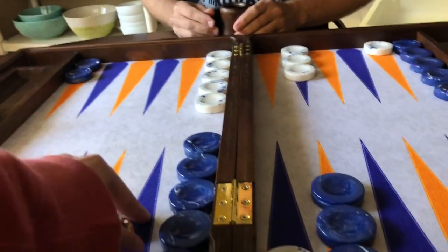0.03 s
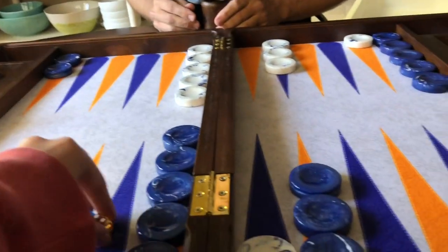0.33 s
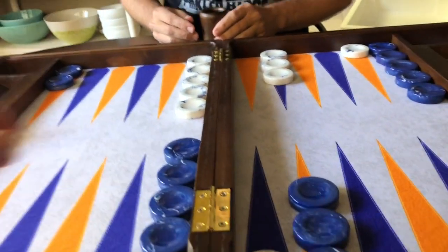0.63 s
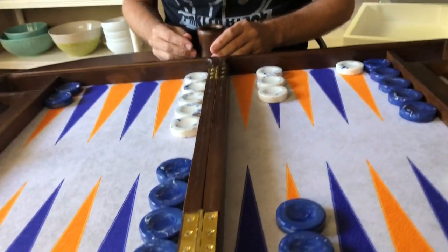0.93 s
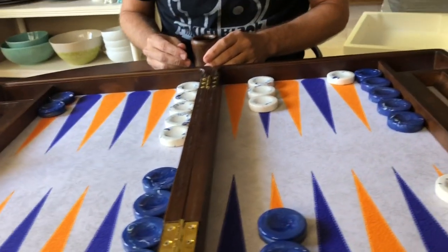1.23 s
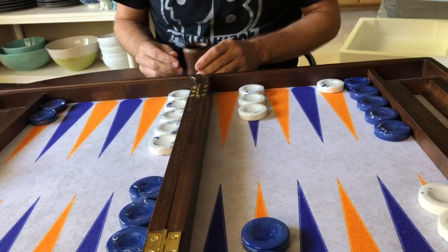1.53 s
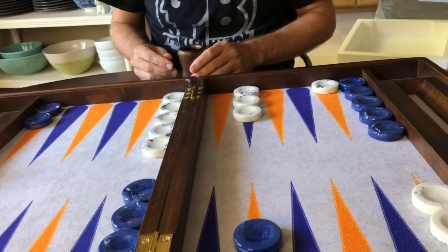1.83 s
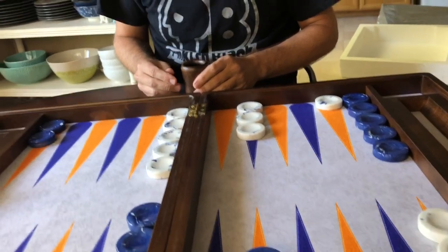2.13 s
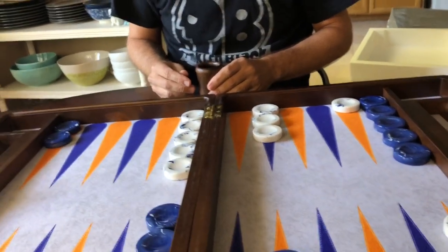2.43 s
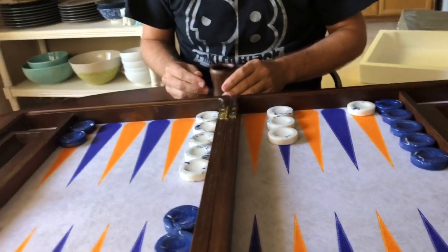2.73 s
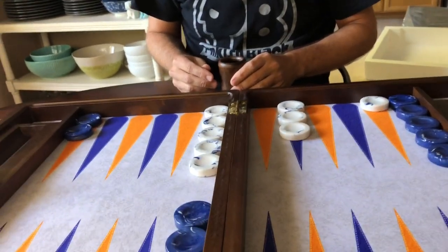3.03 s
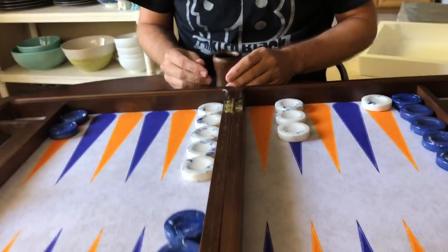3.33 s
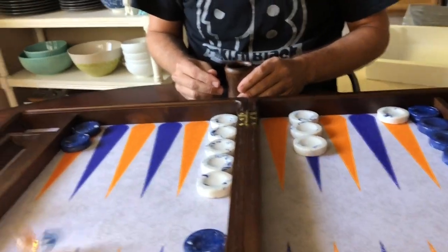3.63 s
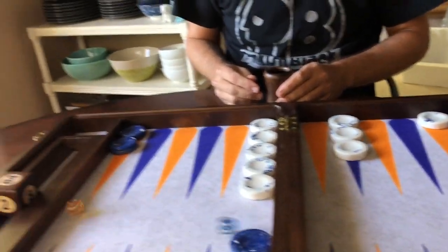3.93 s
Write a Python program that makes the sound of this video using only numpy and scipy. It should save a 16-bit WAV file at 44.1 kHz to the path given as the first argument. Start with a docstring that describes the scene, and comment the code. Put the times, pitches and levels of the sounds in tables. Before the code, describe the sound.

Dice are shaken and thrown on a wooden backgammon board in a quiet room with a faint hum. First a checker clacks down at about 1.4 seconds, followed by soft rustling and sliding. The dice rattle in a cup from 2.2 seconds, fading by 3. Another checker clacks at 3.4. Near 3.7 the dice strike the rim with the loudest knock and bounce briefly.

```python
"""A quiet kitchen, backgammon: a checker is set down on the wooden board, two dice rattle in a cup,
another checker clacks, then the dice are thrown, strike the rim and bounce over the board.
Blows ring damped modes of checker, board, dice and cup; hard edges add a bright crack.
Sleeves, hands and sliding things make shaped noise. The room rings briefly over a faint hum."""
import sys
import numpy as np
from scipy import signal
from scipy.fft import rfft, irfft
from scipy.io import wavfile
from scipy.ndimage import uniform_filter1d

SR = 44100
rng = np.random.default_rng(int(sys.argv[2]) if len(sys.argv) > 2 else 0)


def store_pcm(level_fs):
    """Save levels as 16-bit WAV."""
    pcm = np.round(np.clip(level_fs, -1, 1) * 32767).astype(np.int16)
    wavfile.write(sys.argv[1], SR, np.atleast_2d(pcm).T)


N = 176400

# room tail (frequency [Hz], t60 [s], level [dB])
ROOM_BANDS = [(100, 0.2, 13), (250, 0.58, 7), (600, 0.81, 1), (1270, 0.62, -1.5), (2440, 0.59, -3.5),
              (8000, 0.37, -1.5), (15100, 0.14, 8)]
# room noise (frequency [Hz], level [dB])
FLOOR_SPECTRUM = [(20, -25.5), (64, -5), (134, -8.5), (256, -9.5), (677, -19), (1560, -27), (16000, -40)]
# hum, second harmonic (time [s], level [dB])
HUM_SWELL = [(0, -61.5), (.2, -57.5), (.36, -71), (.7, -70), (.9, -74), (1.4, -84.5), (2, -69), (3.3, -72)]
# hum, steady partials (harmonic [1], level [dB])
HUM_HARMONICS = [(1, -70.5), (3, -80.5), (4, -79), (6, -85)]
# sleeve rustle, sliding hiss, scrape on the board (time [s], level [dB])
RUSTLE_LEVEL = [(0, -74.5), (1.45, -91), (1.56, -45), (1.7, -62.5), (2.3, -73), (2.65, -51), (3, -76),
                (3.2, -65.5), (3.4, -73), (4, -60)]
SLIDE_LEVEL = [(0, -82), (.22, -69.5), (.42, -86), (.72, -72), (.9, -83.5), (1.4, -81), (1.68, -62.5),
               (1.8, -72), (1.96, -62.5), (2.14, -76), (2.32, -58), (2.45, -60), (2.68, -58), (3.0, -70.5),
               (3.15, -66.5), (3.35, -69.5), (3.55, -80)]
SCRAPE_LEVEL = [(1.7, -100), (1.95, -62), (2.06, -68), (2.25, -100)]
# their spectra (frequency [Hz], level [dB])
RUSTLE_SPECTRUM = [(120, -14), (200, 0.5), (450, -5), (1800, -10), (2100, -24), (3690, -22), (14000, -48)]
SLIDE_SPECTRUM = [(1500, -3.5), (3500, -1), (5000, -2.5), (7500, -4), (10000, -7.5), (12500, -11.5),
                  (16000, -10)]
SCRAPE_SPECTRUM = [(2000, -36.5), (3500, -9), (6000, -28)]
# checker impacts (time [s], ring [dB], crack [dB], crack pitch [ratio])
CHECKER_HITS = [(1.4421, -20.5, -21.5, 0.46), (1.4465, -17, -23, 0.67), (1.6181, -46, -38.5, 0.53),
                (3.4112, -24.5, -45, 0.85), (3.4285, -21.5, -35, 0.87)]
# checker resonances (frequency [Hz], level [dB], t60 [s])
CHECKER_MODES = [(1147, -4.5, 0.022), (1316, -3, 0.011), (1668, -9, 0.022), (2432, 0, 0.024),
                 (2440, -16, 0.0099), (3570, -14.5, 0.011), (2390, -33.5, 0.71)]
# crack of a hard edge (frequency [Hz], level [dB])
EDGE_SPECTRUM = [(800, -53), (3000, -9.5), (4500, -10), (7000, 0.5), (9400, -4), (12000, -17), (15500, -26)]
# soft impacts (time [s], level [dB], pitch [Hz])
BUMP_HITS = [(1.4431, -29, 479), (1.523, -35.5, 294), (1.533, -34, 147.6), (1.778, -34.5, 145),
             (2.180, -37.5, 240.5), (2.306, -34, 253), (2.385, -39, 240), (2.432, -39, 296),
             (2.602, -36.5, 260), (3.172, -43.5, 250), (3.266, -46.5, 250), (3.657, -16, 163),
             (3.681, -18, 158), (3.822, -28, 368), (3.826, -28, 177), (3.935, -33, 303)]
# bump resonances (frequency [ratio], level [dB], t60 [s])
BUMP_MODES = [(.76, -4.5, .055), (1, 1, .05), (1.45, -8.5, 0.08)]
# blows on the board (time [s], rim [dB], left half [dB], right half [dB], contact [ms])
BOARD_HITS = [(1.4435, -21, -52, -27.5, 0.019), (1.5233, -29.5, -50, -36, 0.027),
              (1.55, -29.5, -52, -40.5, 0.13), (3.6501, -4.5, -24.5, -45, .0076),
              (3.6525, -18.5, -25, -61, 0.089), (3.6747, -11.5, -29, -59, 0.11),
              (3.822, -26.5, -33.5, -51, 0.29), (3.9335, -33, -32, -59, 0.74)]
# board rim and halves (frequency [Hz], level [dB], t60 [s])
RIM_MODES = [(423, -10, 0.02), (930, -10, 0.024), (1406, -0.5, 0.013), (1852, 2.5, 0.0083),
             (2303, 5, 0.0038), (2930, -4, 0.0046), (5050, -25, 0.0097)]
LEFT_HALF_MODES = [(130, -7, .4), (170, 3, .55), (205, -4, .35), (245, 2, .4), (291, -2, .35),
                   (372, -1, .17), (422, -3, .22), (742, -3, .23), (871, 0, .23), (947, -4, .23),
                   (1156, 0, .2), (1285, -1, .17), (1408, 0, .18), (1488, -3, .18)]
RIGHT_HALF_MODES = [(311, -5, .25), (351, 0, .28), (444, -4, .2), (545, -3, .2), (880, -5, .25),
                    (1084, -2, .33), (1154, -1, .28), (1267, -4, .22)]
# edge on edge (time [s], crack [dB], ring [dB], pitch [Hz])
CLICK_HITS = [(1.5304, -36, -26, 5900), (1.552, -33, -36, 6500), (1.6590, -58, -38, 6360),
              (2.082, -33.5, -62, 6910), (2.0855, -36, -37, 3860), (2.192, -26.5, -49, 7000),
              (2.2720, -25, -28, 7300), (2.298, -39, -31.5, 6000), (2.3132, -22, -24, 7600),
              (2.316, -32.5, -41.5, 6600), (2.4603, -37, -46, 7100), (2.5129, -30, -39, 7160),
              (2.6061, -44.5, -36, 6000), (2.6481, -34, -47, 7260), (2.6612, -31.5, -48, 6600),
              (2.7520, -37, -41, 6200), (2.895, -42, -44, 7200), (2.9033, -43, -49.5, 5980),
              (3.1438, -43.5, -44, 4540), (3.6589, -18.5, -52, 7500), (3.9936, -59, -37.5, 3270)]
# die resonances (frequency [ratio], level [dB], t60 [s])
DIE_MODES = [(1, -3.5, 0.0061), (1.3, -10, 0.0067)]
# dice jostling (start [s], end [s], tick rate [1/s], level [dB])
JOSTLE_SPANS = [(2.192, 2.33, 102, -38.5), (2.416, 2.75, 50, -46.5), (2.751, 2.96, 35, -57)]
# pushes over felt (time [s], length [s], checker [dB], hiss [dB])
FELT_PUSHES = [(1.814, 0.066, -52.5, -84), (3.015, 0.021, -81, -58), (3.161, 0.013, -54.5, -75)]
# pushed checker, felt hiss (frequency [Hz], level [dB])
PUSH_SPECTRUM = [(300, -7), (490, 1), (620, -3.5), (1850, -10), (2200, -14.5), (4000, -16), (8000, -37.5)]
FELT_SPECTRUM = [(3000, -5.5), (8000, 9)]
# dice on the cup (time [s], wall [dB], air [dB], crack [dB], wall pitch [ratio])
DICE_CUP_HITS = [(2.1779, -20.5, -48, -28, 0.54), (2.1871, -16, -25, -21.5, 0.9),
                 (2.2341, -13, -24, -47, 1.033), (2.2526, -20.5, -24.5, -47, 1.13),
                 (2.2756, -18.5, -34, -37, 1.01), (2.3, -38, -31, -36, 0.59),
                 (2.3159, -42, -31.5, -49.5, 0.79), (2.3810, -11, -22, -27.5, 1.02),
                 (2.4323, -56, -28.5, -39.5, 1.9), (2.5299, -73, -30.5, -39, 1),
                 (2.5511, -26, -31, -62, 1.02), (2.5802, -15.5, -27, -33.5, 1.09),
                 (2.6593, -29, -34, -62, 0.91), (2.7488, -33.5, -36.5, -34, 0.83),
                 (2.8507, -46.5, -62, -56, .55), (3.1421, -44, -65, -43, 0.58)]
# cup wall (frequency [Hz], level [dB], t60 [s])
CUP_WALL_MODES = [(1820, 1, 0.0092), (2315, 19, 0.0043), (2885, -6.5, 0.017), (3350, -1.5, 0.0061),
                  (4720, 3.5, 0.0032)]
# air in the cup (frequency [ratio], level [dB], t60 [s])
CUP_AIR_MODES = [(0.99, 0, 0.019)]
# air resonance as the hand shifts over the cup's mouth (time [s], pitch [Hz])
CUP_AIR_PITCH = [(2.38, 812), (2.52, 866), (2.59, 860)]


def undb(db):
    """Decibels to gain."""
    return 10 ** (np.asarray(db) / 20)


def envelope(points):
    """Gain curve from (time [s], level [dB])."""
    return undb(np.interp(np.arange(N) / SR, *np.array(points).T))


def noise(spectrum):
    """Unit-rms noise shaped by (frequency [Hz], level [dB])."""
    hz, db = np.array(spectrum).T
    bin_hz = np.maximum(np.fft.rfftfreq(N, 1 / SR), 1)
    gain = undb(np.interp(np.log(bin_hz), np.log(hz), db))
    bass_rolloff = np.minimum(bin_hz / hz[0], 1) ** 2
    y = irfft(rfft(rng.standard_normal(N)) * gain * bass_rolloff, N)
    return y / y.std()


def wander(rate_hz):
    """Smooth random curve, unit spread."""
    hold = max(int(SR / rate_hz), 1)
    steps = np.repeat(rng.standard_normal(N // hold + 1), hold)
    y = uniform_filter1d(steps, hold)[:N]
    return y / y.std()


def decay(t, t60_s):
    """Fall of 60 dB per t60."""
    return np.exp(-np.log(1000) * t / t60_s)


def peak_amplitude(x):
    """Sine-equivalent amplitude of the loudest millisecond."""
    return np.sqrt(2 * uniform_filter1d(x ** 2, SR // 1000).max())


def ring(modes, rise_cycles, pitch=1, contact_ms=0, scatter=0):
    """Struck modes, detuned at random by `scatter`; longer contact dulls them."""
    t = np.arange(SR // 2) / SR
    y = 0
    for frequency, db, t60_s in modes:
        cycles = frequency * pitch * (1 + scatter * rng.uniform(-1.186, 1)) * t
        attack = 1 - np.exp(-(cycles / rise_cycles) ** 2)
        y = y + undb(db) * np.sin(2 * np.pi * cycles) * attack * decay(t, t60_s)
    if contact_ms > 0:
        pole = np.exp(-1000 / (contact_ms * SR))
        y = signal.lfilter([1], np.poly([pole, pole]), y)
    fade_out = np.minimum(10 * (t[-1] - t), 1)
    return y * fade_out / peak_amplitude(y)


def crack(t60_s, pitch=1):
    """Snap of a hard edge: filtered impulse with a short grainy tail."""
    t = np.arange(SR // 20) / SR
    hz, db = np.array(EDGE_SPECTRUM).T
    bin_hz = np.maximum(np.fft.rfftfreq(len(t), 1 / SR), 1)
    gain = undb(np.interp(np.log(bin_hz), np.log(hz * pitch), db))
    grain = undb(-20) * rng.standard_normal(len(t)) * decay(t, t60_s)
    burst = np.roll((t == 0) + grain, SR // 2000)  # space for the filter's pre-ring
    y = irfft(rfft(burst) * gain, len(t))
    return y / peak_amplitude(y)


def add(track, at_s, sound):
    """Mix a sound in."""
    start = int(at_s * SR)
    track[start:start + len(sound)] += sound[:N - start]


def low_cut(x, hz):
    """Small things radiate little bass."""
    return signal.sosfilt(signal.butter(3, hz, "high", fs=SR, output="sos"), x)


def in_room(x, wet_db, gap_s=0.0032, build_s=0.0041, early_db=7, early_s=0.023):
    """Source plus echo: strong early reflections, then a tail whose treble dies first."""
    t = np.arange(SR) / SR
    hz, t60_s, db = np.array(ROOM_BANDS).T
    log_hz = np.log(np.maximum(np.fft.rfftfreq(SR, 1 / SR), 1))
    white = rfft(rng.standard_normal(SR))
    echo = 0
    for k, weights in enumerate(np.eye(len(hz))):
        band = irfft(white * np.interp(log_hz, np.log(hz), weights), SR)
        echo = echo + undb(db[k]) * band * decay(t, t60_s[k])
    echo *= np.clip((t - gap_s) / build_s, 0, 1)
    echo *= 1 + undb(early_db) * np.exp(-t / early_s)
    echo /= np.sqrt(np.sum(echo ** 2))
    return x + undb(wet_db) * signal.fftconvolve(x, echo)[:N]


def background(hum_hz=129.8, floor_db=-65.5):
    """Room noise and a faint hum whose second harmonic swells and fades."""
    phase = 2 * np.pi * np.cumsum(hum_hz * (1 + .004 * wander(27))) / SR
    swell = envelope(HUM_SWELL) * np.sin(2 * phase)
    steady = sum(undb(db) * np.sin(k * phase) for k, db in HUM_HARMONICS)
    return undb(floor_db) * noise(FLOOR_SPECTRUM) + np.sqrt(2) * (swell + steady)


def rubbing():
    """Uneven friction: sleeves and hands rustle, sliding things hiss and scrape."""
    rustle = noise(RUSTLE_SPECTRUM) * envelope(RUSTLE_LEVEL) * undb(2 * wander(97))
    friction = undb(2 * wander(40) + 1.56 * wander(400))
    slide = noise(SLIDE_SPECTRUM) * envelope(SLIDE_LEVEL)
    scrape = noise(SCRAPE_SPECTRUM) * envelope(SCRAPE_LEVEL)
    return rustle + (slide + scrape) * friction


def checkers():
    """Struck checkers crack and ring briefly; one mode lingers faintly."""
    out = np.zeros(N)
    for at_s, ring_db, crack_db, pitch in CHECKER_HITS:
        add(out, at_s, undb(ring_db) * ring(CHECKER_MODES, rise_cycles=0.41, scatter=0.0178))
        add(out, at_s, undb(crack_db) * crack(t60_s=0.014, pitch=pitch))
    return in_room(low_cut(out, hz=466), wet_db=-5)


def bumps():
    """Soft impacts of hands, cup and tumbling dice: low, damped modes."""
    out = np.zeros(N)
    for at_s, db, hz in BUMP_HITS:
        add(out, at_s, undb(db) * ring(BUMP_MODES, rise_cycles=0.73, pitch=hz, scatter=0.057))
    return in_room(low_cut(out, hz=115), wet_db=-11)


def board():
    """The wooden rim knocks dryly; the halves boom like shallow boxes, the struck one most."""
    rim, halves = np.zeros(N), np.zeros(N)
    for at_s, rim_db, left_db, right_db, contact_ms in BOARD_HITS:
        knock = ring(RIM_MODES, rise_cycles=0.97, contact_ms=contact_ms, scatter=0.14)
        add(rim, at_s, undb(rim_db) * knock)
        for db, modes in (left_db, LEFT_HALF_MODES), (right_db, RIGHT_HALF_MODES):
            boom = ring(modes, rise_cycles=0.37, contact_ms=contact_ms, scatter=0.0047)
            add(halves, at_s, undb(db) * boom)
    return in_room(low_cut(rim, hz=260), wet_db=-5) + in_room(low_cut(halves, hz=106), wet_db=-10)


def clicks(tick_hz=7000, tick_spread_db=2.5):
    """Hard plastic on plastic: bright crack, very short ring; jostling dice tick at random."""
    out = np.zeros(N)
    for at_s, crack_db, ring_db, hz in CLICK_HITS:
        add(out, at_s, undb(ring_db) * ring(DIE_MODES, rise_cycles=0.62, pitch=hz, scatter=0.012))
        add(out, at_s, undb(crack_db) * crack(t60_s=0.0093))
    for at_s, end_s, rate_hz, db in JOSTLE_SPANS:
        for gap, strength, detune in rng.standard_normal(size=(24, 3)):
            at_s += np.exp(gap / 2) / rate_hz
            hz = tick_hz * np.exp(.18 * np.tanh(detune))
            tick = ring(DIE_MODES, rise_cycles=0.69, pitch=hz)
            if at_s < end_s:
                add(out, at_s, undb(db + tick_spread_db * strength) * tick)
    return in_room(out, wet_db=-7)


def pushes(attack_s=0.0081, release_s=0.014):
    """Stick-slip over felt: the checker sounds its hollow, the cloth hisses."""
    t = np.arange(N) / SR
    hollow, hiss = noise(PUSH_SPECTRUM), noise(FELT_SPECTRUM)
    out = np.zeros(N)
    for at_s, length_s, hollow_db, hiss_db in FELT_PUSHES:
        attack = np.clip((t - at_s) / attack_s, 0, 1)
        release = np.exp(-np.maximum(t - at_s - length_s, 0) / release_s)
        out += attack * release * (undb(hollow_db) * hollow + undb(hiss_db) * hiss)
    stick_slip = undb(2.3 * wander(250))
    return in_room(out * stick_slip, wet_db=-6.5)


def cup():
    """Each die that hits the cup cracks, rings the wall and sounds the air inside."""
    out = np.zeros(N)
    for at_s, wall_db, air_db, crack_db, pitch in DICE_CUP_HITS:
        air_hz = np.interp(at_s, *np.array(CUP_AIR_PITCH).T)
        add(out, at_s, undb(wall_db) * ring(CUP_WALL_MODES, rise_cycles=0.73, pitch=pitch, scatter=0.021))
        add(out, at_s, undb(air_db) * ring(CUP_AIR_MODES, rise_cycles=.7, pitch=air_hz, scatter=.01))
        add(out, at_s, undb(crack_db) * crack(t60_s=0.011, pitch=0.88))
    return in_room(low_cut(out, hz=422), wet_db=-9)


def scene():
    """Mono sum of all sources."""
    impacts = cup() + clicks() + checkers() + board() + bumps()
    return (impacts + rubbing() + pushes() + background())[None]


def record(dry):
    """Steep low-pass at 15.8 kHz."""
    return signal.sosfilt(signal.ellip(8, .2, 70, 15800, fs=SR, output="sos"), dry)


dry = scene()
out = record(dry)
store_pcm(out)
```